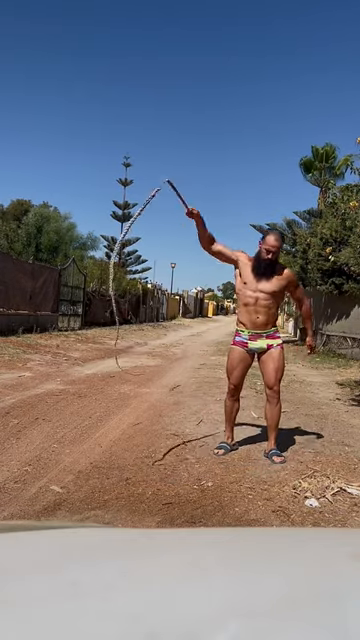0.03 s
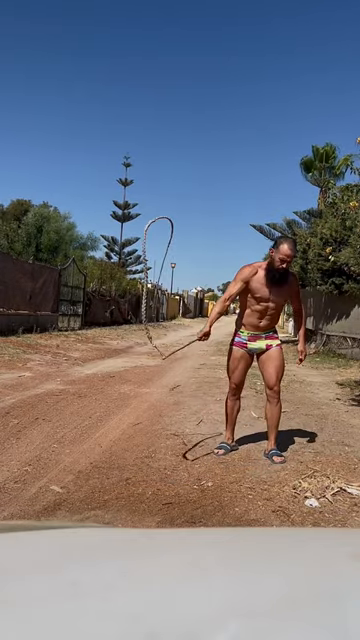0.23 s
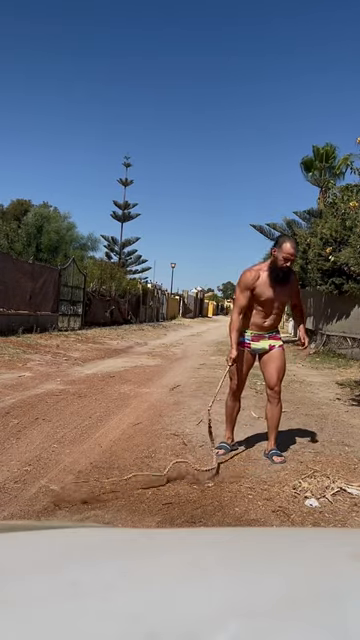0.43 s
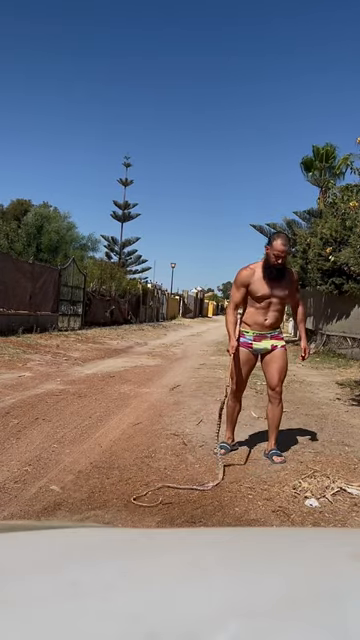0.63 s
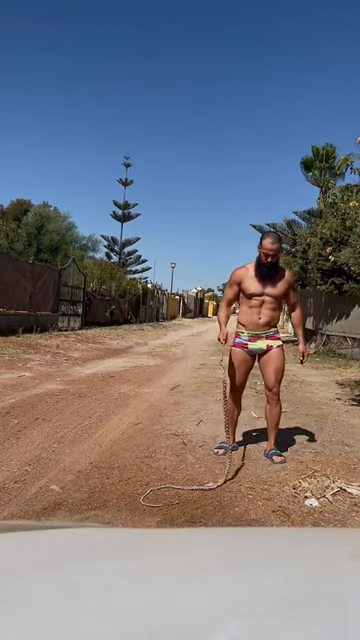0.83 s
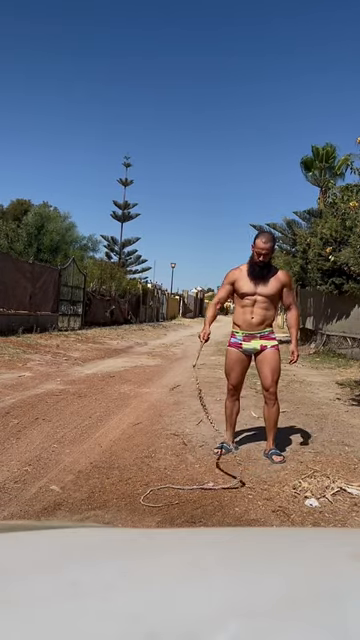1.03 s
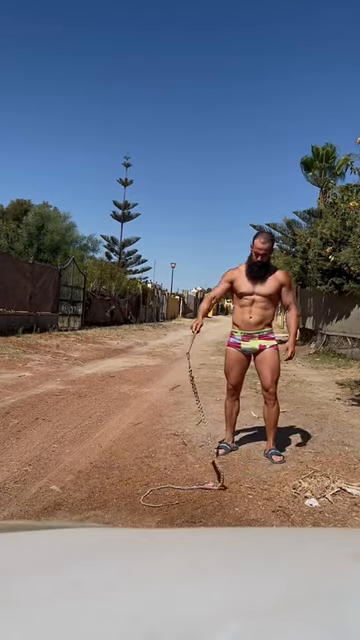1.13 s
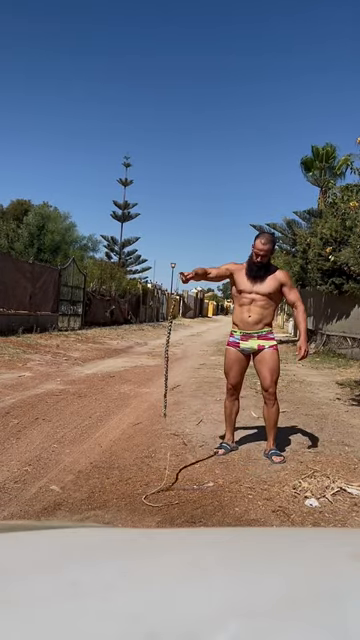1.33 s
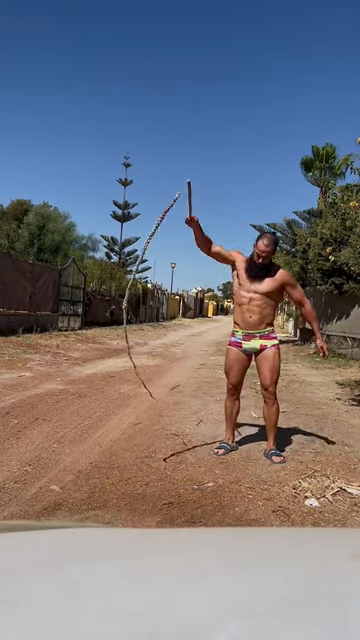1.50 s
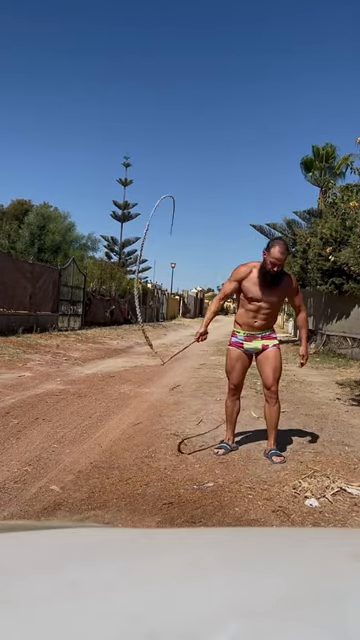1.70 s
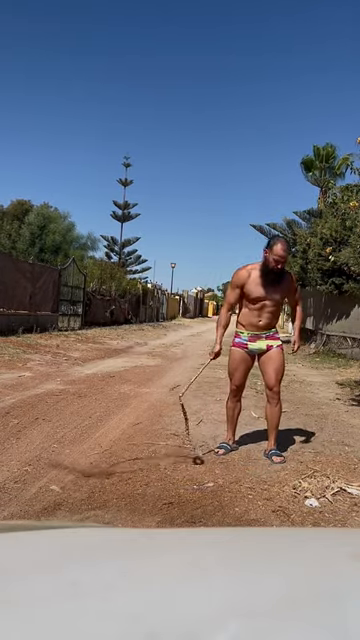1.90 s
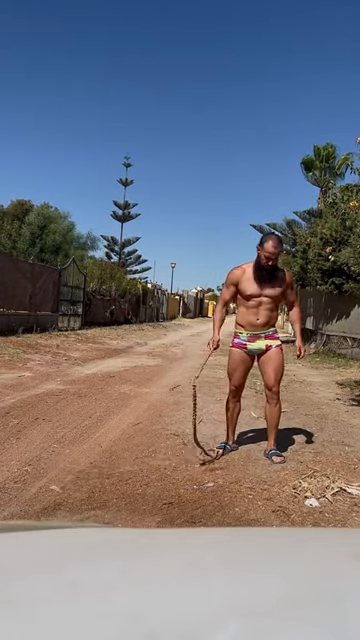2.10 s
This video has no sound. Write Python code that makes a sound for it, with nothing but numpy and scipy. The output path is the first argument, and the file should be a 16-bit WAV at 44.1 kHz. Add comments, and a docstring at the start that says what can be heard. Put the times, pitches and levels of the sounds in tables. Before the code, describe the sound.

Two hard, bright whip cracks near the microphone in the open air, each a tight cluster of snaps with slapping echoes and a brief crackling tail, separated by a quiet gap with faint rumble and a small tick.

```python
"""Two sharp whip cracks ring out on a dirt road, with short swishes and low falling blips around them.
A grainy wash and distinct echoes answer from fences and trees, over a low outdoor rumble.
Snaps, swishes, puffs and ticks are coloured noise under short envelopes; blips are falling sines.
The wash is noise grains that fade faster in the treble; the echoes are band-filtered clicks."""
import sys
import numpy as np
from scipy import signal
from scipy.fft import rfft, irfft
from scipy.io import wavfile
from scipy.ndimage import map_coordinates

SR = 44100
rng = np.random.default_rng(int(sys.argv[2]) if len(sys.argv) > 2 else 0)


def pcm_store(signal):
    """Save signal as 16-bit PCM."""
    levels = np.round(np.clip(np.atleast_2d(signal), -1, 1) * 32767)
    wavfile.write(sys.argv[1], SR, levels.astype(np.int16).T)


N = 94815
TIME = np.arange(N) / SR  # seconds
BINS = np.maximum(np.fft.rfftfreq(N, 1 / SR), 1)  # Hz, kept above zero for the logarithms
# the two cracks, each starting a wash: t/s, wash level/dB, wash tilt/(dB per octave)
CRACK_TIMES = [(0.2462, -20.5, 0), (1.7121, -25, 2)]


def from_db(db):
    """Turn decibels into a gain."""
    return 10 ** (np.asarray(db) / 20)


def rms_one(x):
    """Scale to an average strength (rms) of 1."""
    return x / np.sqrt(np.mean(x ** 2) + 1e-20)


def over_hz(table, axis=1):
    """Join one column of a table by straight lines over log frequency."""
    table = np.array(table)
    return np.interp(np.log(BINS), np.log(table[:, 0]), table[:, axis])


def panned(pan_db):
    """Left and right gains; positive pan is louder on the left."""
    return from_db(np.array([[.5], [-.5]]) * pan_db)


def hump(hz, octaves):
    """A bell-shaped frequency band, as gains."""
    return np.exp(-.5 * (np.log2(BINS / hz) / octaves) ** 2)


def spread(pair, gains):
    """Colour two unrelated noises, then add and subtract them to set how alike left and right are."""
    # the stereo picture: f/Hz, left-right likeness (1 = same), left minus right/dB
    stereo_picture = [(61.6, 0.99, -0.5), (203, 0.93, 1), (450, 0.92, -6), (770, 0.035, 3), (1070, 0.36, 7),
                      (2600, 0.02, 3.5), (4417, 0.056, 6), (6443, 0.21, 10), (8300, .2, 0),
                      (15070, 0, -0.5)]
    alike = np.clip(over_hz(stereo_picture), -.995, .995)
    mid, side = rfft(pair) * gains
    both = np.sqrt(1 + alike) * mid + np.sqrt(1 - alike) * side * [[1], [-1]]
    balance = panned(over_hz(stereo_picture, axis=2))
    return irfft(both * balance, N) / np.sqrt(2)


def noise(gains):
    """Steady stereo noise of a given colour, rms 1."""
    return rms_one(spread(rng.standard_normal((2, N)), gains))


def swell(s, rise, fall, hold=0):
    """Exponential rise up to time s, a hold, then an exponential fall."""
    before = np.minimum(TIME - s, 0)
    after = np.maximum(TIME - s - hold, 0)
    return np.exp(before / rise - after / fall)


def flutter(per_s):
    """Random ups and downs: per_s new values each second, joined by straight lines."""
    return np.interp(TIME * per_s, np.arange(N), rng.standard_normal(N))


def burst(s, db, rise, fall, hz, width, pan=0):
    """A short swell of noise in one frequency band."""
    return from_db(db) * panned(pan) * swell(s, rise, fall) * noise(hump(hz, width))


def rumble():
    """The outdoor background: steady noise, strongest in the bass."""
    # background colour, relative: f/Hz, level/dB
    rumble_colour = [(20, -17.5), (35, -15), (69, 0.5), (110, -6), (200, -13), (420, -16), (700, -26),
                     (1500, -32), (4000, -42), (9000, -51.5), (11000, -63.5), (16000, -64.5)]
    level_db = -58
    return from_db(level_db) * noise(from_db(over_hz(rumble_colour)))


def wash(s, db, tilt_db):
    """Countless small reflections from ground, fences and leaves; the treble fades fastest."""
    # colour and fading of the wash: f/Hz, relative level/dB, extra loss/(dB per s)
    wash_colour = [(59.73, -5, 0), (159.2, -6.5, 9.5), (386, -6.5, 15.5), (545, -6, 14.5), (662.7, -5, 12),
                   (1280, -3, 11), (1660, 0, 7), (3280, 0.64, 11.5), (5370, -4.5, 22.5), (6350, -8.5, 32),
                   (8240, -4.5, 46.5), (12310, -14, 61.5), (14200, -23, 75), (15940, -16.5, 70)]
    # thinning out with travel time: delay/s, level/dB
    wash_decay = [(0, -21.5), (.016, -2.5), (.045, -0.5), (.095, -4.5), (.135, -7.5), (.195, -11.5),
                  (.24, -15.5), (.36, -23), (.7, -45.5), (1.5, -100)]
    grain_db = 3.5  # random spread of the grain levels
    crackles_per_s, crackle_db = 410, -11.5
    flicker_db, flickers_per_s = 0.55, 250  # level changes shared by all bands
    clump_db, clumps_per_s = 1.85, 120  # uneven bunching, different in each band

    age = np.maximum(TIME - s, 0)
    grain_gains = from_db(grain_db * rng.standard_normal((2, N)))
    grains = rms_one(rng.standard_normal((2, N)) * grain_gains)
    # sparse stronger reflections of random sign
    crackle_hits = rng.random((2, N)) < crackles_per_s / SR
    crackle = rms_one(crackle_hits * rng.choice([-1, 1], (2, N)))
    fade_db = np.interp(age, *np.transpose(wash_decay))
    level_db = db + fade_db + flicker_db * flutter(flickers_per_s)
    grains = rms_one(grains + from_db(crackle_db) * crackle)
    grains = grains * (TIME > s) * from_db(level_db)

    tilt = tilt_db * np.log2(BINS / 3000)
    colour = rms_one(from_db(over_hz(wash_colour) + tilt))
    centres, _, losses = np.transpose(wash_colour)
    out = 0
    # each row of the identity matrix makes one overlapping triangular band
    for loss, band in zip(losses, np.eye(len(centres))):
        band_db = clump_db * flutter(clumps_per_s) - loss * age
        band_gains = over_hz(np.c_[centres, band])
        out = out + spread(grains * from_db(band_db), colour * band_gains)
    return out


def bunches():
    """Hedges and trees return bunches of reflections, made as short bursts of band noise."""
    # t/s, level/dB, rise/s, fall/s, centre f/Hz, width/octaves, pan/dB
    bunch_list = [(0.274, -19, 0.0083, 0.0039, 1900, 0.92, 0), (0.334, -24.5, .003, 0.0034, 3900, 0.33, 0),
                  (0.344, -25, 0.0023, 0.0023, 3970, .5, 5), (0.403, -31.5, 0.0026, 0.0033, 2000, 0.26, 8),
                  (0.42, -25, 0.0033, 0.0056, 2820, 0.42, -1), (.442, -34, 0.0016, 0.0027, 3580, 0.3, 5),
                  (0.526, -39.5, 0.0034, 0.0068, 2900, 0.83, -1),
                  (0.588, -51, 0.0024, 0.0026, 4950, 0.62, -4),
                  (0.619, -54, 0.0016, 0.0034, 2200, 0.71, -2), (1.738, -20, 0.0017, .003, 2000, 0.99, 4),
                  (1.795, -27, 0.0031, 0.0045, 6400, 0.31, -2),
                  (1.8093, -29.5, 0.0018, 0.0046, 4370, 0.23, 9.5),
                  (1.808, -26.5, 0.0022, 0.0024, 8200, 0.11, -3),
                  (1.868, -32, 0.0022, 0.0023, 4500, 0.81, 1),
                  (1.879, -28.5, 0.0009, 0.0022, 5460, 0.48, -2),
                  (1.962, -45.5, 0.0024, 0.0079, 3570, .6, 5)]
    return sum(burst(*row) for row in bunch_list)


def echoes():
    """Walls and posts return each shock as single clicks, narrowed in pitch by the surface."""
    # delay/s, level after crack 1/dB, level after crack 2/dB, low f/Hz, high f/Hz, pan/dB
    # (levels are those of the clicks before the band filter)
    echo_list = [(.029, 7, -2, 1200, 3200, 1.5), (.043, -1, -8, 3010, 7500, 9.5),
                 (.0887, -4, -26, 2000, 6460, 0.5), (0.1284, 12.5, 2.5, 1415, 3200, 6.5),
                 (.1552, -6, -16, 1500, 5500, 7.5), (0.166, -8.5, -6, 2200, 6500, 13),
                 (.2025, -6, -4.5, 2780, 5800, 8), (.2027, -25, -25, 7000, 14000, -0.5),
                 (0.2057, -5.5, -9.5, 2620, 5300, 19), (.2503, -14, -33, 1810, 5400, 14),
                 (0.317, -19, -26, 2230, 5400, 18)]
    out = 0
    for delay, *levels_db, low_hz, high_hz, pan in echo_list:
        clicks = 0
        for crack, db in zip(CRACK_TIMES, levels_db):
            clicks = clicks + from_db(db) * signal.unit_impulse(N, int((crack[0] + delay) * SR))
        band = signal.butter(3, [low_hz, high_hz], "band", fs=SR, output="sos")
        # the tiny offset keeps the filter away from extremely small numbers
        out = out + panned(pan) * signal.sosfilt(band, clicks + 1e-18)
    return out


def puffs():
    """Low puffs and soft thumps, made from band noise."""
    # t/s, level/dB, rise/s, fall/s, centre f/Hz, width/octaves
    puff_list = [(0.256, -37, 0.017, 0.0095, 150.3, 0.63), (0.268, -38.5, 0.0086, 0.012, 72.5, 0.36),
                 (0.799, -51.5, 0.019, 0.012, 75, 0.17), (1.719, -38, 0.01, 0.017, 168.5, 1),
                 (1.733, -32.5, 0.0076, 0.018, 58, 0.12), (1.812, -35.5, 0.054, 0.035, 247, 1)]
    return sum(burst(*row) for row in puff_list)


def ticks():
    """Faint brief ticks and knocks of band noise."""
    # t/s, level/dB, rise/s, fall/s, centre f/Hz, width/octaves
    tick_list = [(0.179, -53.5, 0.0048, 0.0073, 610, 2.17), (0.6639, -43, 0.00085, 0.0019, 960, 0.35),
                 (1.421, -73, 0.0017, 0.0055, 3610, 0.2), (1.997, -55, 0.0016, 0.0033, 950, 0.49)]
    return sum(burst(*row) for row in tick_list)


def swish(s, db, rise, fall, hz, width, glide, pan):
    """A swell of band noise read at a changing speed, so that its pitch can glide."""
    # the glide stays within one octave of the centre pitch, which is reached at time s
    speed = 2 ** np.clip(glide * (TIME - s), -1, 1)
    place = np.cumsum(speed) % N
    gliding = [map_coordinates(side, [place], mode="wrap") for side in noise(hump(hz, width))]
    return from_db(db) * panned(pan) * swell(s, rise, fall) * np.array(gliding)


def swishes():
    """Bands of noise, some gliding in pitch: short swells around the cracks and a long faint hiss."""
    # t/s, level/dB, rise/s, fall/s, centre f/Hz, width/octaves, glide/(octaves per s), pan/dB
    swish_list = [(0.099, -75.5, 0.22, 0.38, 5700, 0.37, 1, 0.5),
                  (0.22, -44, 0.0054, 0.016, 1340, 0.33, -20.5, 2.5),
                  (0.236, -46, 0.005, .004, 1797, 0.3, 7.5, 14.5),
                  (0.238, -41, 0.006, .007, 948, 0.3, -7.5, 8),
                  (0.2459, -44, 0.016, 0.0033, 5830, 0.89, 0, 3.5),
                  (1.49, -69, 0.044, .06, 821, 0.057, 0, 2),
                  (1.697, -39.5, 0.0031, 0.0078, 1790, 0.28, 6.5, -8.5),
                  (1.706, -27.5, 0.0018, 0.0085, 2730, 0.15, 35, 3),
                  (1.711, -41.5, 0.008, 0.0015, 1010, 0.97, -1, 7.5),
                  (1.71, -42, 0.012, 0.0028, 6110, 0.71, 0, 0),
                  (1.7172, -26, 0.0007, 0.002, 1690, 0.24, 1.5, 10)]
    return sum(swish(*row) for row in swish_list)


def blips():
    """Low blips, sines that sweep quickly down in pitch, with a slightly hollow ring."""
    # low falling blips, some close to the cracks, others later (levels before the ring is added):
    # t/s, level/dB, start f/Hz, length/s, pan before the pitch-dependent part/dB
    blip_list = [(0.245, -12, 1665, 0.012, -4), (0.3126, -23, 1586, 0.0085, -8),
                 (0.3829, -24, 1730, .0095, -5.5), (1.711, -18.5, 1775, 0.012, -5),
                 (1.777, -23.5, 1460, 0.008, -8), (1.793, -28.5, 1420, 0.008, -5),
                 (1.8045, -30, 1180, 0.0048, -4), (1.809, -23.5, 1183, 0.0062, -4)]
    end_hz, fall_s, rise_s = 195, .0022, 0.0044
    pan_db_per_hz = 0.0189  # the high start lies further left
    ring_hz, ring_width_hz, ring_gain = 505, 74, 1
    out = 0
    for s, db, start_hz, length, pan in blip_list:
        age = np.clip(TIME - s, 0, length)
        hz = end_hz + (start_hz - end_hz) * np.exp(-age / fall_s)
        envelope = (1 - np.exp(-age / rise_s)) * np.cos(.5 * np.pi * (age / length) ** 2)
        wave = np.sin(2 * np.pi * np.cumsum(hz * (age > 0)) / SR)
        out = out + from_db(db) * panned(pan + pan_db_per_hz * hz) * envelope * wave
    ring = signal.iirpeak(ring_hz, ring_hz / ring_width_hz, fs=SR)
    return out + ring_gain * signal.lfilter(*ring, out)


def snaps():
    """The whip tip and its nearest reflections: very short broad noise with a treble sizzle."""
    # t/s, level/dB, hold/s, decay/s, sizzle against body/dB, pan/dB
    snap_list = [(0.2465, -13.5, 0.0013, 0.00088, -11, -2.5), (0.2484, -23, .003, 0.0068, -11, 8),
                 (0.2573, -13, 0.00088, .0006, -1.5, -3.5), (0.2592, -14, 0.0019, 0.003, -7.5, 0.5),
                 (1.7109, -23, 0.003, 0.0041, -12.5, -4), (1.7232, -12.5, 0.00051, 0.0015, -5.5, -5.5),
                 (1.7259, -29, 0.0032, 0.015, 1.5, 20), (1.7269, -14.5, 0.0014, 0.00073, 7.5, -5.5),
                 (1.731, -22, 0.00142, 0.0018, -5.5, 5), (1.7384, -23.5, 0.00044, 0.0025, -15, 1)]
    # colour of the body, relative: f/Hz, level/dB
    snap_colour = [(200, -9.5), (700, -4.5), (1500, -3.5), (3000, -4), (5000, 2.5), (8000, -1),
                   (10000, -11.5), (12000, -2), (15500, -15)]
    rise_s = 0.00025
    sizzle_hz, sizzle_octaves = 8200, .13
    body = noise(from_db(over_hz(snap_colour)))
    sizzle = noise(hump(sizzle_hz, sizzle_octaves))
    out = 0
    for s, db, hold, decay, sizzle_db, pan in snap_list:
        # a random shift gives each snap its own stretch of noise
        grain = np.roll(body + from_db(sizzle_db) * sizzle, rng.integers(N), axis=1)
        out = out + from_db(db) * panned(pan) * swell(s, rise_s, decay, hold) * grain
    return out


def scene():
    """Add the background, the answer of the road, the small sounds and the whip snaps."""
    road = sum(wash(*crack) for crack in CRACK_TIMES) + bunches() + echoes()
    small_sounds = puffs() + ticks() + swishes() + blips()
    return rumble() + road + small_sounds + snaps()


def record(dry):
    """Round off the loudest peaks, then cut the top of the treble."""
    overload, cutoff_hz = .86, 15900  # overload: the ceiling that peaks bend towards
    rounded = overload * np.tanh(dry / overload)
    top = signal.ellip(10, .2, 80, cutoff_hz, fs=SR, output="sos")
    return signal.sosfilt(top, rounded)


dry = scene()
out = record(dry)
pcm_store(out)
```